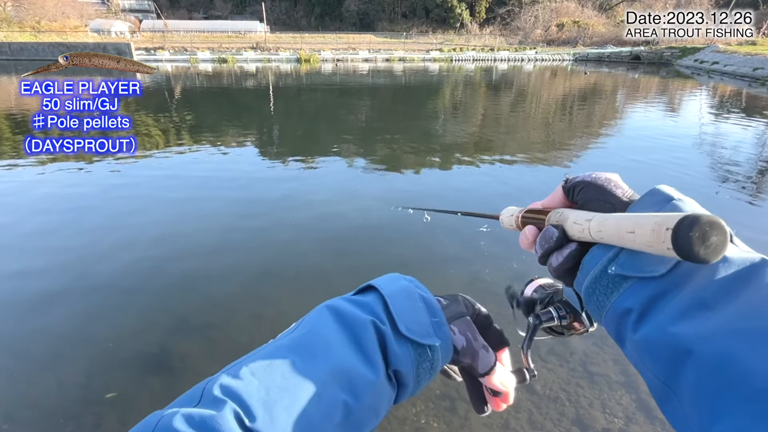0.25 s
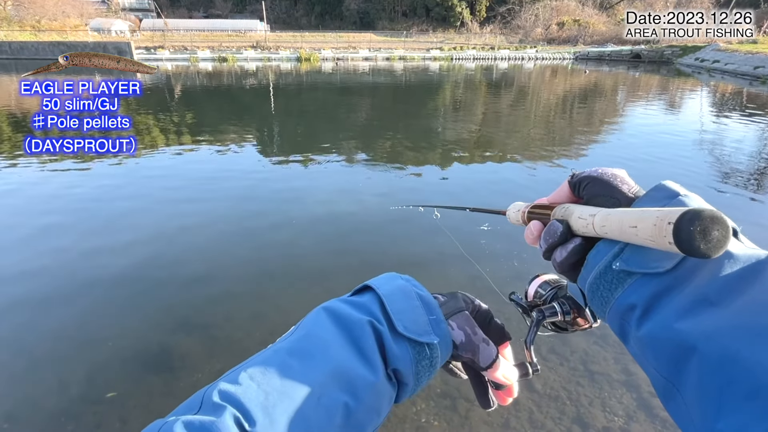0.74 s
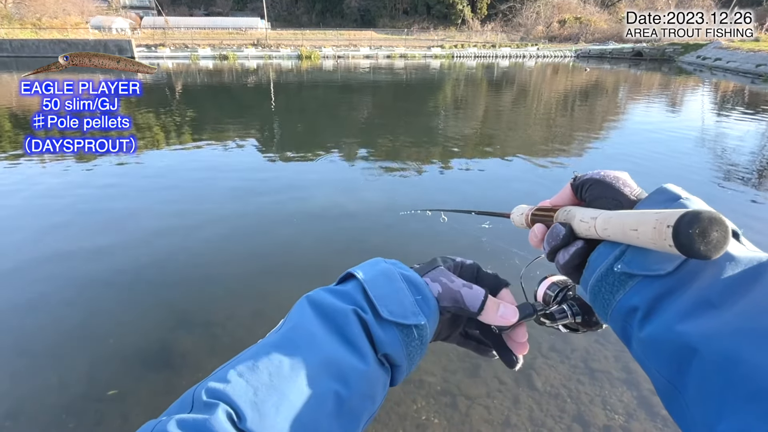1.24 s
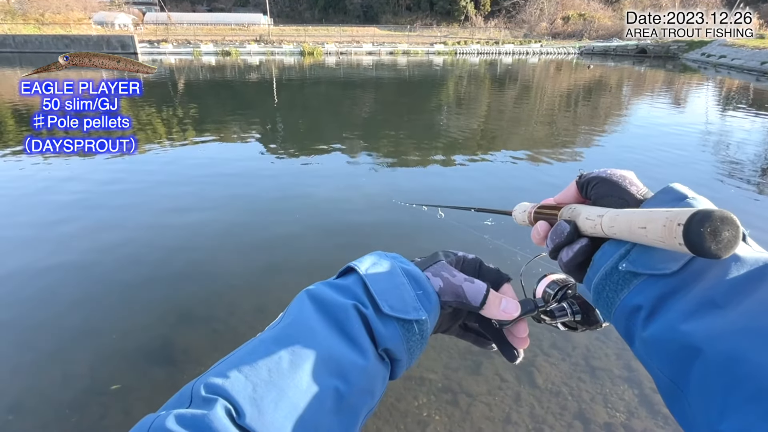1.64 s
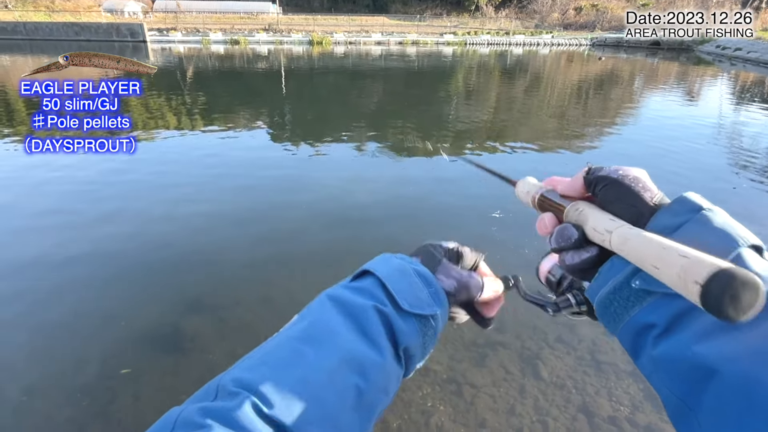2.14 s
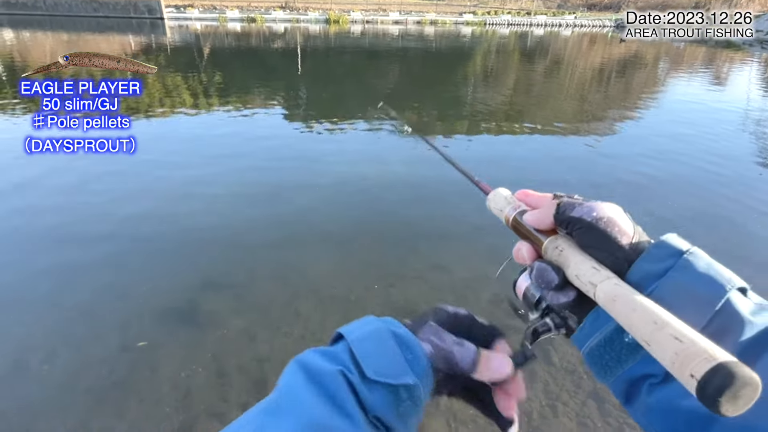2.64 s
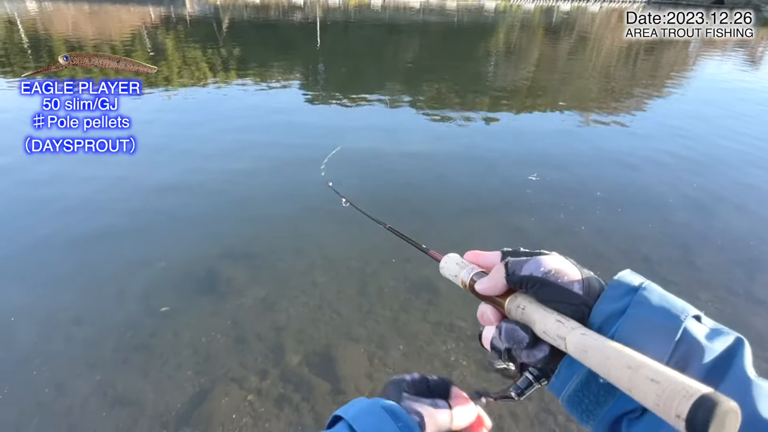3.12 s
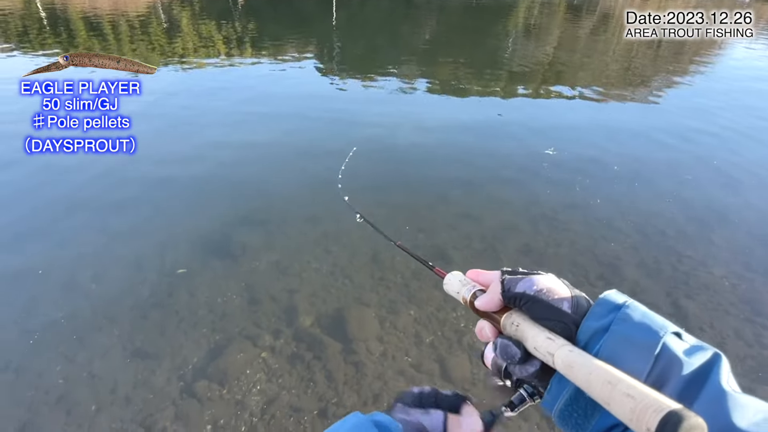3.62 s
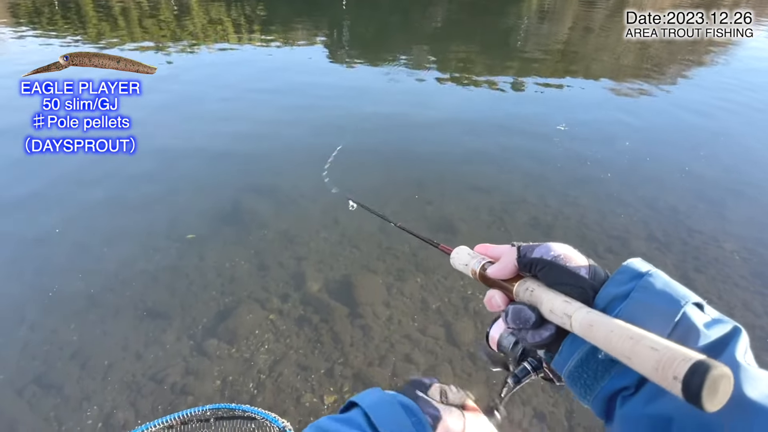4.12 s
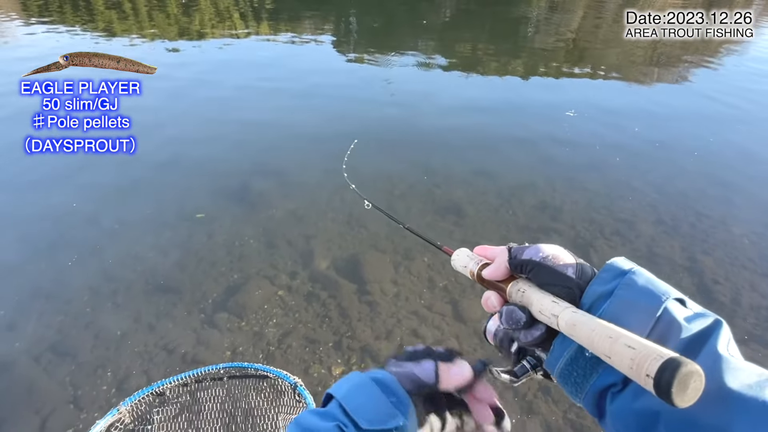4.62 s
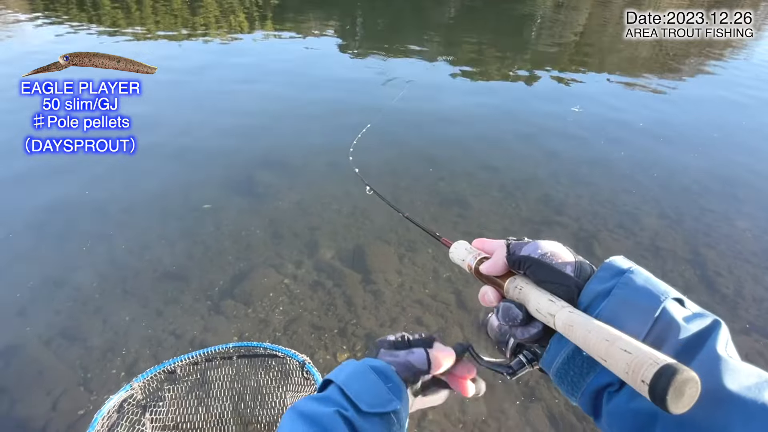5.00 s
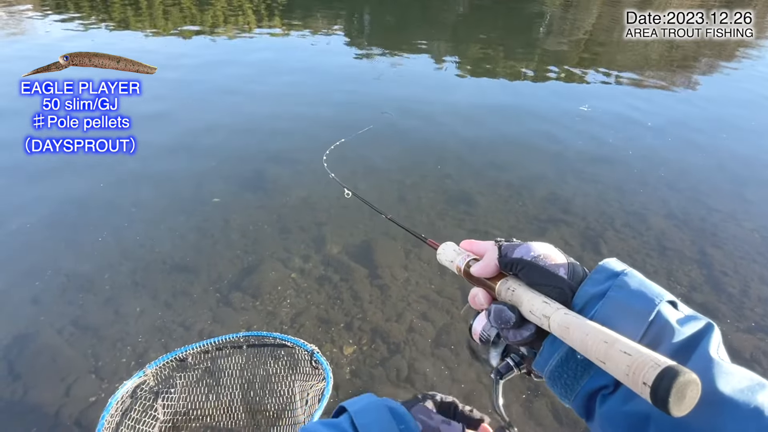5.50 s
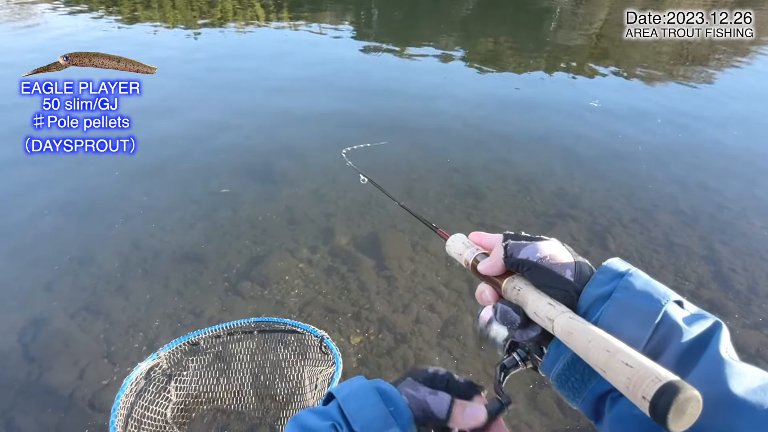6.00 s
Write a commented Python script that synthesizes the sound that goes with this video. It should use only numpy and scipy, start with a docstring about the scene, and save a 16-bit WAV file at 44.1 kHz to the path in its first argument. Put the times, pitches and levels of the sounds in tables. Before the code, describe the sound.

Close to the chest outdoors by a pond, two quiet seconds hold only low motor hum, soft air and water wash, faint sleeve rustle and tiny tackle ticks. Then a spinning reel's drag breaks into a crisp, high metallic buzz, racing and easing in quick pulses, slowing to separate clicks, and ending with short fresh bursts.

```python
"""A spinning reel held close to chest-worn microphones at a pond, a hooked fish pulling line off it.
The drag's spring clicks over the spool's teeth, racing and slowing with each tail beat, then ticking
singly; each click is a burst of damped modes with a diffuse tail thrown back by the surroundings.
Line hisses, sleeves rustle and the outdoor wash lies behind, all as shaped noise; tackle ticks as
short bursts with a small ring, and a distant pump motor hums as two wavering sines."""
import sys
import numpy as np
from scipy import signal
from scipy.fft import rfft, irfft
from scipy.io import wavfile
from scipy.ndimage import uniform_filter1d

SR = 44100
rng = np.random.default_rng(int(sys.argv[2]) if len(sys.argv) > 2 else 0)


def transcribe(u):
    """Save the signal u as a 16-bit wav file named by the first command-line argument.

    u: samples, shape (n,) or (channels, n), limited to [-1, 1]; the rate is SR.
    q: integer samples, one column per channel.
    """
    v = np.clip(np.atleast_2d(u).T, -1, 1)
    q = np.round(v * 32767).astype(np.int16)
    wavfile.write(sys.argv[1], SR, q)


N = 275659

# How the hands hold the reel to the microphones. Each row: time in seconds, base peak of a running
# click in dB, level of the cavity and level of the spring, both in dB above the rim.
HOLD = [(2.16, -33, -14, -12), (2.23, -41, -10, 6), (2.35, -36.5, -8.5, -1.5), (2.45, -38.5, -10.5, -1),
        (2.55, -39.5, -11, 6), (2.64, -37, -6.5, -4), (2.72, -35.5, -9.7, -5), (2.79, -36, -8.5, 0),
        (2.9, -36, -8.5, -0.5), (3.05, -38, -3.5, -0.5), (3.2, -36.5, -7, -1.5), (3.4, -36, -5, -3),
        (3.58, -38, -5.5, -1), (3.8, -35.5, -6.5, -2), (4.0, -37.5, -6.5, 0.5), (4.2, -35, -7.5, -2.5),
        (4.4, -37.5, -5, 0.5), (4.6, -35.5, -9, -2.5), (4.7, -40, -3, 3), (4.85, -31, -16.5, -8),
        (5.0, -37, -7.5, -2), (5.1, -34, -10.5, -4), (5.4, -18, -3, -0.5), (5.75, -35.5, -9, -5.5),
        (5.92, -34.5, -5.5, -3.5), (6.02, -37, -12, -3), (6.1, -36, -6.5, -7), (6.25, -36, -8, -1)]


def amp(db):
    """Amplitude factor of a level in dB."""
    return 10 ** (np.asarray(db) / 20)


def read(points, hz):
    """Reads a curve of (Hz, value) rows, straight over log frequency."""
    f, value = np.transpose(points)
    return np.interp(np.log(hz + 1), np.log(f + 1), value)


def noise(spectrum, same, lead, patchy_db):
    """Stereo noise of rms 1 from random short-time spectra with drifting patches."""
    # Balance of the two microphones. Each row: frequency in Hz, left over right in dB.
    lean_curve = [(60, 2), (380, -4.5), (700, 1.5), (2400, 4), (5000, -2.5), (15000, 1)]
    hz = np.fft.rfftfreq(1024, 1 / SR)
    a, b, c, d, patch = rng.standard_normal((N // 256 + 5, 513, 5)).T
    patch = uniform_filter1d(patch, size=12, axis=0)
    patch = uniform_filter1d(patch, size=12, axis=1)
    likeness = np.clip(same(hz), -1, 1)[:, None]
    half_lean = amp(read(lean_curve, hz)[:, None] / 2)
    left = a + 1j * b
    right = likeness * left + np.sqrt(1 - likeness ** 2) * (c + 1j * d)
    right = right * np.exp(-1j * lead(hz))[:, None]  # the left leads by this phase
    spectra = np.array([left * half_lean, right / half_lean])
    spectra *= amp(read(spectrum, hz)[:, None] + patchy_db * patch / patch.std())
    x = signal.istft(spectra, nperseg=1024, noverlap=768)[1][:, :N]
    return x / x.std()


def place(s, sounds):
    """Adds short stereo sounds (events x channels x samples) at their start times."""
    at = np.round(s * SR).astype(int)[:, None] + np.arange(sounds.shape[-1])
    return np.array([np.bincount(at.ravel(), sounds[:, c].ravel(), N + SR)[:N] for c in range(2)])


def ring(modes, count, size, rise_s, detune, spread_db, blur_rad, slip_rad, tuning=1):
    """Struck modes, a little different at each blow and each microphone; energy 1 a blow."""
    snap, snap_s = 1.6, .0011  # extra swing at the blow, and how soon it is damped
    t = np.arange(size) / SR
    rise = (1 - np.exp(-(t / rise_s) ** 2)) ** 2
    fade = 1 - (t / t[-1]) ** 2
    blow = 1 + snap * np.exp(-(t / snap_s) ** 2 / 2)
    chance = rng.standard_normal((count, len(modes), 5))
    # pitch and strength are alike at neighbouring blows
    chance[..., :2] = .7 * chance[..., :2] + 2 * uniform_filter1d(chance[..., :2], size=9, axis=0)
    out = np.zeros((count, 2, size))
    for k, (hz, t60, db, lead) in enumerate(modes):
        pitch, strength, start, left, right = chance[:, k].T[:, :, None]
        phase = 2 * np.pi * hz * (tuning + detune * pitch) * t + k + slip_rad * start
        shape = amp(db + spread_db * strength - 60 * t / t60) * rise * fade * blow
        out[:, 0] += shape * np.sin(phase + lead + blur_rad * left)
        out[:, 1] += shape * np.sin(phase + blur_rad * right)
    return out / np.sqrt((out ** 2).sum(-1).mean(-1))[:, None, None]


def teeth(rows):
    """Times at which teeth pass the spring in one run of the spool, and the tooth rate there."""
    s, rate = np.transpose(rows)
    t = np.arange(s[0], s[-1], 1 / SR)
    row = np.interp(t, s, np.arange(len(s)))
    eased = row // 1 + .5 - .5 * np.cos(np.pi * (row % 1))
    rate = np.maximum(np.interp(eased, np.arange(len(s)), rate), 20)
    passed = np.cumsum(rate) / SR
    at = np.interp(np.arange(int(passed[-1] + 1.3)), passed, t)
    return at, np.interp(at, t, rate)


def snaps():
    """Times and peak levels of the spring's snaps; faster teeth snap harder, at uneven strength."""
    # One list a run of the spool, starting on a click and easing between rows.
    # Each row: time in seconds, tooth rate in teeth per second.
    runs = [
        [(2.1666, 40.0), (2.242, 206.0), (2.256, 173.0), (2.281, 186.0), (2.356, 44.0), (2.392, 70.0)],
        [(2.3999, 202.0), (2.452, 366.0), (2.476, 235.0), (2.567, 463.0), (2.624, 177.0), (2.687, 366.0),
         (2.769, 75.0)],
        [(2.7755, 187.0), (2.824, 420.0), (2.897, 178.0), (2.967, 353.0), (3.032, 193.0), (3.08, 360.0),
         (3.154, 102.0)],
        [(3.1612, 155.0), (3.227, 415.0), (3.309, 124.0), (3.363, 440.0), (3.43, 69.0), (3.443, 94.0)],
        [(3.4531, 152.0), (3.497, 326.0), (3.578, 122.0), (3.627, 343.0), (3.706, 113.0), (3.77, 358.0),
         (3.823, 403.0), (3.894, 103.0)],
        [(3.9006, 124.0), (3.959, 274.0), (4.001, 141.0), (4.074, 379.0), (4.139, 115.0), (4.184, 302.0),
         (4.23, 278.0), (4.288, 105.0)],
        [(4.2976, 167.0), (4.334, 308.0), (4.408, 116.0), (4.466, 316.0), (4.568, 115.0), (4.6, 217.0),
         (4.662, 75.0)],
        [(4.8648, 80.0), (4.918, 96.0), (4.944, 85.0), (5.0, 108.0), (5.08, 96.0), (5.139, 55.0)],
        [(5.7144, 107.0), (5.756, 223.0), (5.803, 149.0)],
        [(5.83, 85.0), (5.854, 201.0), (5.887, 128.0), (5.953, 238.0), (6.012, 67.0), (6.114, 100.0),
         (6.159, 94.0), (6.209, 252.0), (6.251, 223.0)],
    ]
    # Single clicks while the spool creeps. Each row: time in seconds, base peak in dB.
    creep = [(4.67, -35), (4.684, -36), (4.7, -34), (4.7154, -35.5), (4.7333, -41), (4.7553, -38),
             (4.773, -38), (4.79, -36), (4.808, -36), (4.828, -37), (4.847, -35), (5.1548, -38.5),
             (5.176, -38.5), (5.1998, -36.5), (5.2309, -37), (5.2643, -38), (5.295, -35), (5.327, -33.5),
             (5.357, -34.5), (5.379, -38), (5.4035, -38), (5.4265, -36), (5.445, -36.5), (5.466, -34.5),
             (5.4935, -36), (5.528, -38), (5.5572, -35), (5.582, -41), (5.6103, -33), (5.633, -39),
             (5.6507, -38), (5.6676, -38), (5.683, -36), (5.701, -34)]
    # Teeth with a level of their own, louder or softer.
    # Each row: time in seconds, change in level in dB.
    single_teeth = [(2.234, 5.5), (2.288, 4.5), (2.412, 7), (2.4505, 3), (2.4991, 9), (2.5315, 6),
                    (2.5855, 4), (2.6772, 0), (2.7886, 3), (2.9091, 4.5), (2.9421, -8), (3.0314, 0),
                    (3.0753, 1), (3.235, 5), (3.3355, 7), (3.459, 9.5), (3.578, 4), (3.586, 5), (3.635, 3),
                    (3.7265, -0.5), (4.0046, 3), (4.0855, -1), (4.184, 1), (4.942, 4.5), (5.104, 0),
                    (5.739, 4), (5.8455, 2), (5.9443, -2), (6.087, 2.5), (6.0966, 5), (6.1374, 5)]
    harder_db, usual_rate = 1.2, 200  # gain per doubling of the tooth rate, from this many teeth per s
    uneven_db = 2.0  # random spread among running clicks
    run_s, rate = np.hstack([teeth(rows) for rows in runs])
    slow_s, slow_db = np.transpose(creep)
    when, click_db, _, _ = np.transpose(HOLD)
    run_db = np.interp(run_s, when, click_db) + harder_db * np.log2(rate / usual_rate)
    run_db = run_db + uneven_db * rng.standard_normal(len(run_s))
    peak_db = np.r_[run_db, slow_db]
    s = np.r_[run_s - .0012, slow_s + .0004]  # start times of the snaps
    single_s, change_db = np.transpose(single_teeth)
    nearest = abs(s - single_s[:, None]).argmin(1)
    peak_db = peak_db + np.bincount(nearest, change_db, len(s))
    s[nearest] = single_s
    return s, peak_db


def spool_turns(s):
    """The spool's open side sweeps past the microphones: beam 0 to 1, cavity gain in dB, tuning."""
    # One row each time the open side faces the microphones.
    # Each row: time in seconds, cavity gain in dB, cavity tuning as a ratio.
    turn_rows = [(2.231, 9, 1), (2.42, 10, 1.03), (2.506, 13, 1.015), (2.565, 10.5, .985),
                 (2.645, 8.5, 0.97), (2.717, 18, 0.94), (2.827, 8, 0.98), (2.921, 9.5, 1),
                 (2.996, 11, 0.98), (3.086, 16, 1.004), (3.2, 9.5, 0.99), (3.268, 11.5, 1), (3.363, 6, .97),
                 (3.484, 9.5, 1), (3.583, 9.5, 0.98), (3.671, 9.5, 1), (3.781, 14.5, 1.03),
                 (3.848, 11, 1.03), (3.973, 12, 1.015), (4.065, 13.5, 0.97), (4.167, 9.5, 1),
                 (4.258, 5, 0.97), (4.364, 7, 1.005), (4.487, 12, 1.01), (4.619, 11.5, 1.03),
                 (4.94, 12, 0.99), (5.36, 2.5, 0.98), (5.742, 16, .98), (5.922, 8, 1.01),
                 (6.092, 12.5, 0.99), (6.249, 5, 1.08)]
    teeth_a_turn = 24  # used for the turn that leads up to the first row
    turn_s, beam_db, tuning = np.transpose(turn_rows)
    tooth = np.argsort(np.argsort(s))  # each snap's place in time order
    facing = np.searchsorted(np.sort(s), turn_s)
    turns = np.interp(tooth, np.r_[facing[0] - teeth_a_turn, facing], np.arange(len(facing) + 1))
    beam = .5 + .5 * np.cos(2 * np.pi * turns)
    return beam, np.interp(s, turn_s, beam_db), np.interp(s, turn_s, tuning)[:, None]


def drag():
    """Each tooth snaps the spring: rim and body ring at once, the spool cavity swells after."""
    # Four sets of modes: bright ones of spring and spool rim, the spring's own thin ring, the hollow
    # spool that answers a moment later, and dull ones of reel body and rod. Each row: base frequency
    # in Hz, 60 dB decay in seconds, level in dB relative to its set, phase lead of the left in radians.
    rim_modes = [(9074, 0.039, -4.5, 5.16), (8380, 0.014, 4.5, 3.6), (9670, 0.0076, 8, 4.57),
                 (11000, 0.003, -2.5, 3.4), (6840, 0.0036, -25, 2.7), (15130, 0.024, 6, 9.36),
                 (16000, 0.0024, -29, 9.5)]
    spring_modes = [(11030, 0.0045, 4.5, 5.7), (11930, 0.018, -1, 7.7), (12300, 0.023, -6, 7.1),
                    (13070, 0.016, 3, 8.47), (13800, 0.017, 4.5, 8.9)]
    cavity_modes = [(5428, 0.0064, 3, 0.93), (6270, 0.0038, 5.5, 1.93), (5004, 0.0063, -7, 0.23)]
    body_modes = [(1423, 0.015, -15.5, 0.065), (1970, 0.009, -8.5, 0.16), (2333, 0.083, -19, 2),
                  (3028, 0.21, -19.5, 3.6), (3530, 0.092, -19.5, 0.12), (3876, 0.33, -23.5, 1.7),
                  (4105, 0.0088, -2, 1.7), (4290, 0.36, -18.5, 3.6)]
    ring_db = 12  # energy of a click above its peak
    beam_sharp = 6.5  # narrowness of the cavity's beam
    s, peak_db = snaps()
    beam, beam_db, tuning = spool_turns(s)
    when, _, cavity_db, spring_db = np.transpose(HOLD)
    cavity_gain = amp(np.interp(s, when, cavity_db) + beam_db * beam ** beam_sharp)[:, None, None]
    spring_gain = amp(np.interp(s, when, spring_db))[:, None, None]
    body_gain = (amp(-13) * (1 + 0.043 * beam))[:, None, None]
    rim = ring(rim_modes, count=len(s), size=448, rise_s=0.0007, detune=.011,
               spread_db=3, blur_rad=0.3, slip_rad=.8)
    spring = ring(spring_modes, count=len(s), size=448, rise_s=0.0008, detune=.013,
                  spread_db=3, blur_rad=0.3, slip_rad=.8)
    cavity = ring(cavity_modes, count=len(s), size=448, rise_s=0.0021, detune=0.019,
                  spread_db=4, blur_rad=0.21, slip_rad=0.74, tuning=tuning)
    body = ring(body_modes, count=len(s), size=1280, rise_s=0.00062, detune=0.014,
                spread_db=4, blur_rad=0.8, slip_rad=.6)
    # the cavity leans to the right microphone, the body to the left
    clicks = rim + spring_gain * spring + cavity_gain * cavity * amp([[-.7], [.7]])
    thuds = body_gain * body * amp([[1.2], [-1.2]])
    force = amp(peak_db + ring_db)[:, None, None]
    return place(s, force * clicks) + place(s, force * thuds)


def scattered(clicks):
    """Hands, sleeves, chest and water throw each click back as a diffuse tail."""
    # Colour of the tail. Each row: frequency in Hz, relative level in dB per Hz.
    echo = [(1470, -20), (2500, -15.5), (2730, -46), (2990, -28), (4400, -2.5), (5390, 6), (7150, -7.5),
            (7740, -9), (9340, -3), (10700, -2.5), (12800, -12), (14300, -23), (15400, -12), (16300, -56)]
    t60_s = .017
    keep = amp(-60 / (t60_s * SR)) ** 2  # power left after one sample
    power = signal.lfilter([1 - keep], [1, -keep], (clicks ** 2).mean(0))
    power = uniform_filter1d(power, size=60, origin=29)  # trailing mean: the tail swells in
    tail = noise(echo, lambda hz: 0.3 + 0 * hz, lambda hz: hz / 1600, patchy_db=1.5)
    return amp(-10.5) * np.sqrt(abs(power)) * tail


def rub(colour, same, patchy_db):
    """Friction noise, loosely alike at both microphones."""
    return noise(colour, lambda hz: same + 0 * hz, lambda hz: 0 * hz, patchy_db)


def line():
    """Line hisses through the rod guides before the spool slips, and goes on at much the same level."""
    # Level of the hiss. Each row: time in seconds, rms in dB.
    slide = [(2.04, -96), (2.11, -69), (2.17, -62), (2.26, -63), (2.33, -64), (3.5, -61.5), (4.602, -64),
             (5.3, -65), (6.25, -62)]
    # Colour of the hiss. Each row: frequency in Hz, relative level in dB per Hz.
    hiss = [(1470, 15), (2500, 13.5), (6600, 17), (7250, -15), (9010, 4), (12500, 11), (14000, -13),
            (16000, -34)]
    db = np.interp(np.arange(N) / SR, *np.transpose(slide), left=-120, right=-120)
    return amp(db) * rub(hiss, same=.4, patchy_db=1.5)


def sleeves():
    """Cloth rubbing as the arms move: each rub swells and fades."""
    # The rubs. Each row: loudest moment in seconds, rms there in dB.
    rustle = [(.2, -66.5), (1.0, -61), (2.14, -64.5)]
    # Colour of the cloth. Each row: frequency in Hz, relative level in dB per Hz.
    cloth = [(700, -20), (1200, 2), (1700, 6.5), (2600, -4), (4000, -5), (6200, -4), (7300, -24),
             (9500, -9), (16000, -18)]
    rise_db, fall_db = 212, 122  # dB per second
    s, db = np.transpose(rustle)[:, :, None]
    since = np.arange(N) / SR - s
    level = amp(db + np.minimum(rise_db * since, -fall_db * since)).sum(0)
    return level * rub(cloth, same=.4, patchy_db=2.5)


def tackle():
    """Short broad knocks: a tick, a burst of noise around a centre pitch, and a small ring."""
    # Each row: start in seconds, peak of the burst in dB, centre in Hz, fall in dB per squared
    # octave, small ring in dB, left over right in dB.
    knocks = [(0.089, -49, 5000, 2, -53, .5), (0.2104, -38.5, 7000, 1, -46.5, -5),
              (1.034, -47.5, 7000, 14, -49, -9), (1.104, -58, 7000, 7, -70, 1),
              (1.109, -57, 7000, 5, -68, 1), (1.2, -45, 700, 6, -74, -2), (2.105, -47.5, 5200, 13, -60, 10),
              (2.403, -30, 1670, 2, -42, 8), (4.249, -49, 900, 9, -70, 5)]
    tink_hz, tink_t60_s = 3920, 0.0046  # the small metal part that rings
    s, db, hz, fall_db, tink_db, pan_db = np.transpose(knocks)[:, :, None]
    after = (np.arange(512) - 60) / SR  # seconds from the blow
    tick = 3 * (after == 0)
    burst = tick + rng.standard_normal((len(s), 512)) * amp(-60 * abs(after) / .008 - 4)
    octaves = np.log2((np.fft.rfftfreq(512, 1 / SR) + 1) / hz)
    burst = irfft(rfft(burst) * amp(-fall_db * octaves ** 2))
    burst *= amp(db) / abs(burst).max(-1, keepdims=True)
    tink = amp(tink_db - 60 * after / tink_t60_s) * np.sin(2 * np.pi * tink_hz * after)
    burst += (after > 0) * tink
    burst *= signal.windows.tukey(512, .2)
    return place(s[:, 0], np.stack([burst * amp(pan_db / 2), burst / amp(pan_db / 2)], 1))


def pump():
    """Two low orders of a distant motor, wavering, nearly alike at both microphones."""
    # Each row: time in seconds, frequency of the first order in Hz, first order and second order in dB rms.
    motor = [(0.0, 54.9, -49.5, -54.5), (0.78, 55.92, -49.5, -54), (0.89, 57.34, -51, -54),
             (0.96, 54.53, -47.5, -58), (1.18, 53.48, -49.5, -56.5), (1.46, 51.47, -49.5, -47),
             (1.88, 50.47, -62, -53), (2.3, 50.07, -56, -49.5), (2.44, 50.22, -61.5, -54),
             (2.79, 51.27, -52.5, -52), (3.01, 50.78, -60, -49), (4.7, 50.29, -58.5, -50),
             (4.89, 50.36, -64.5, -49), (6.04, 51.7, -50.5, -51.5), (6.18, 52.8, -50.5, -52.5),
             (6.25, 50.3, -53, -51)]
    # Slow random wavering of the first and the second order [dB rms].
    waver_db = 1.8, .8
    s, *columns = np.transpose(motor)
    t = np.arange(N) / SR
    hz, first_db, second_db = (np.interp(t, s, c) for c in columns)
    drift = [sum(np.sin(2 * np.pi * (f * t + rng.random())) for f in np.geomspace(1.2, 6, 8)) / 2
             for order in range(2)]
    turn = 2 * np.pi * np.cumsum(hz) / SR
    first = amp(first_db + waver_db[0] * drift[0]) * np.sin(turn + np.array([[.1], [0]]))
    second = amp(second_db + waver_db[1] * drift[1]) * np.sin(2 * turn + np.array([[.15], [0]]))
    second = second * amp([[-.8], [.8]])  # leans right
    return np.sqrt(2) * (first + second)


def wash():
    """Far traffic, water and air as one broad floor of noise, swelling slowly."""
    # Colour of the floor. Each row: frequency in Hz, relative level in dB per Hz.
    floor = [(40, -58), (71, -4), (120, -12), (236, -13.5), (402, -17), (617, -20.5), (930, -27.5),
             (1490, -35.5), (3980, -40), (4500, -46), (5520, -37), (7300, -64), (8400, -51.5), (12000, -56),
             (13500, -78), (16000, -94)]
    # Slow swell. Each row: time in seconds, rms in dB.
    swell_rows = [(0, -53.5), (1.2, -54.5), (2.9, -54), (3.3, -53.5), (4.1, -51.5), (4.5, -53.5),
                  (5.9, -52), (6.25, -55)]
    # Likeness of the two microphones. Each row: frequency in Hz, likeness from 0 to 1.
    same_curve = [(60, .99), (130, .99), (300, .93), (600, .55), (1400, .35), (3000, .2), (12000, .3)]
    # Phase between the microphones. Each row: frequency in Hz, lead of the left in radians.
    lead_curve = [(60, .1), (400, .25), (700, .7), (1100, -.3), (2000, .5), (12000, .5)]
    swell = np.interp(np.arange(N) / SR, *np.transpose(swell_rows))
    return amp(swell) * noise(floor, lambda hz: read(same_curve, hz),
                              lambda hz: read(lead_curve, hz), patchy_db=1.5)


def scene():
    """The reel and its scattered tail up close, the smaller sounds, and the pond behind."""
    clicks = drag()
    return clicks + scattered(clicks) + line() + sleeves() + tackle() + pump() + wash()


def record(dry):
    """Bass cut of the microphones, then the band limit."""
    edge_hz = 16850
    cut = signal.sosfilt(signal.butter(4, 36, "highpass", fs=SR, output="sos"), dry)
    band = signal.firwin(511, edge_hz, window=("kaiser", 9), fs=SR)
    return signal.oaconvolve(cut, band[None], "same")


dry = scene()
out = record(dry)
transcribe(out)
```